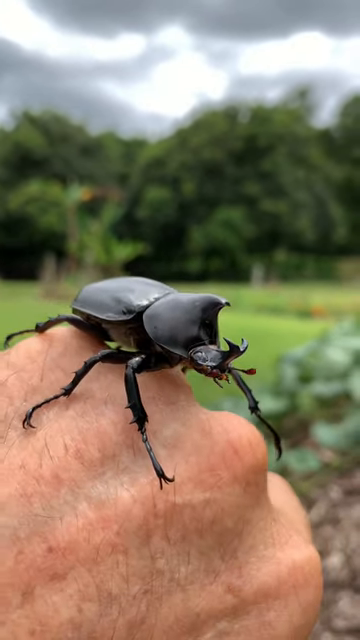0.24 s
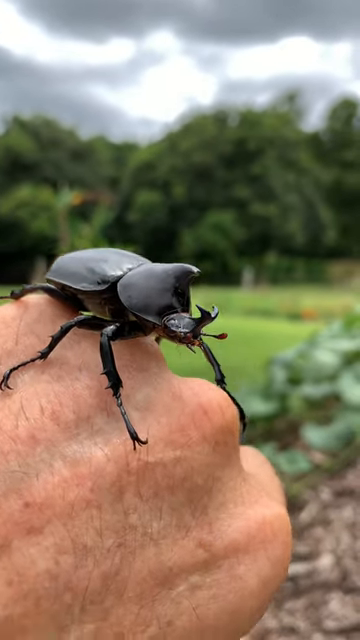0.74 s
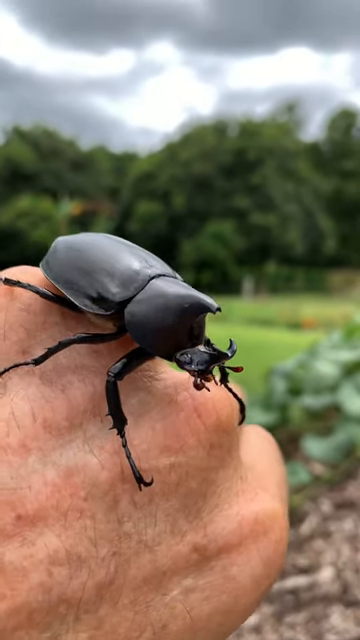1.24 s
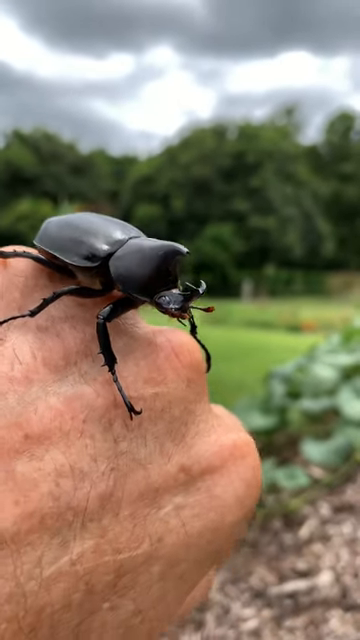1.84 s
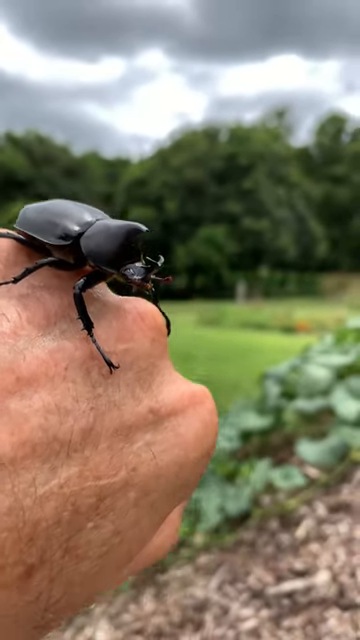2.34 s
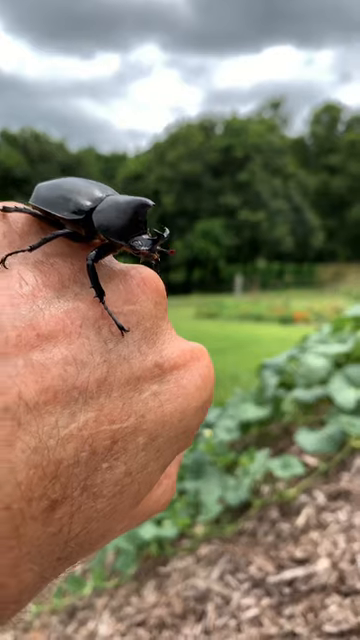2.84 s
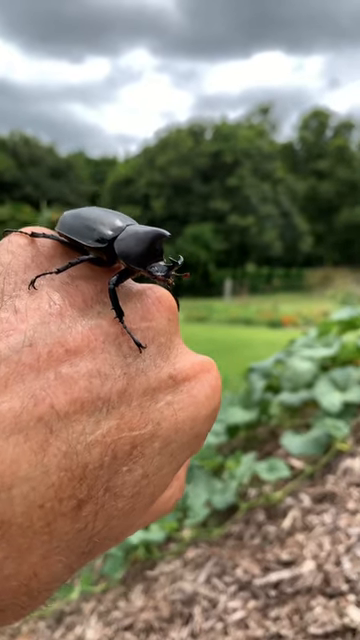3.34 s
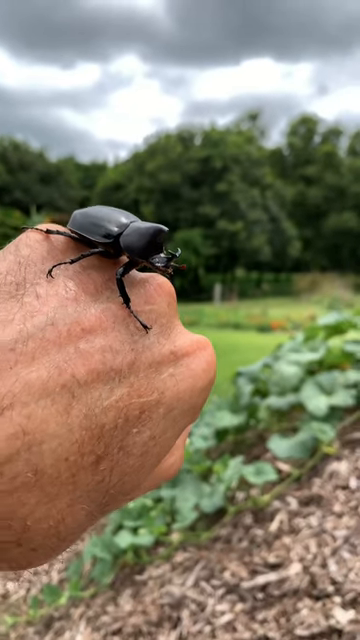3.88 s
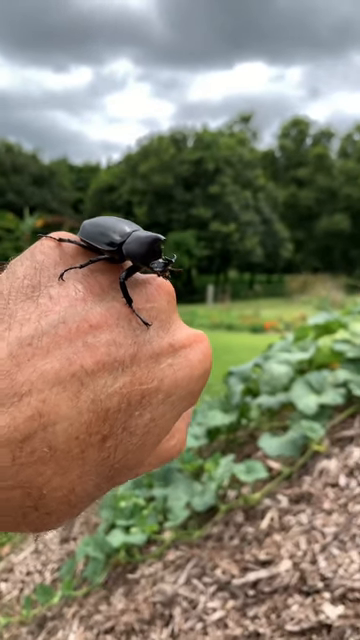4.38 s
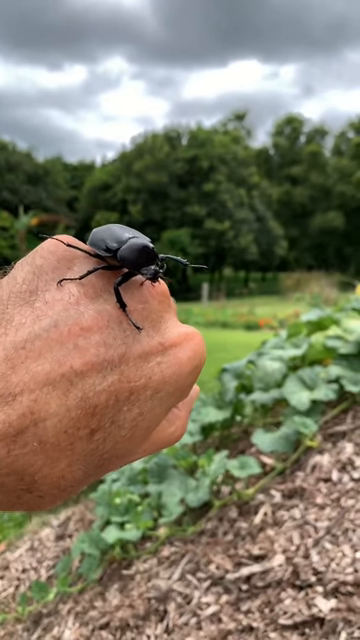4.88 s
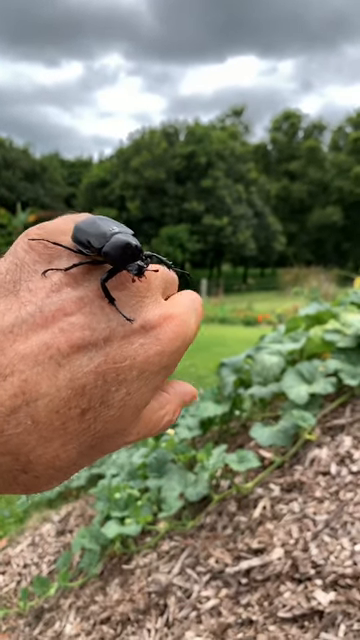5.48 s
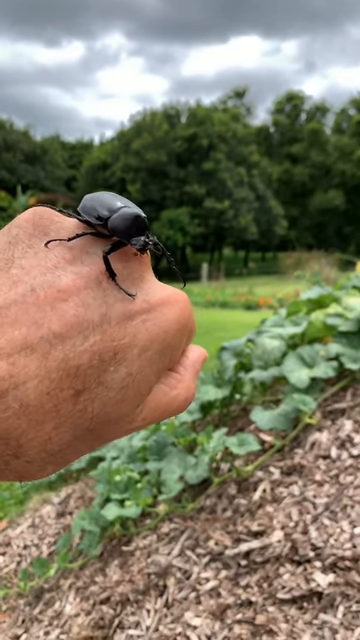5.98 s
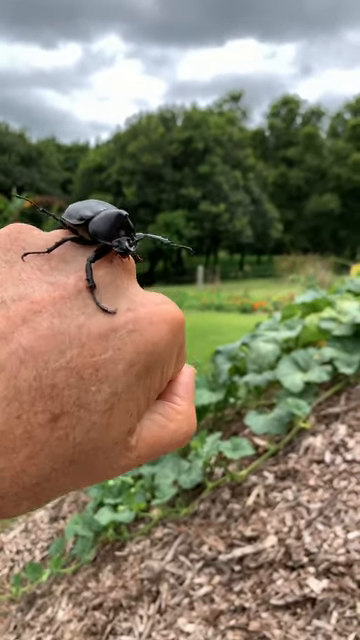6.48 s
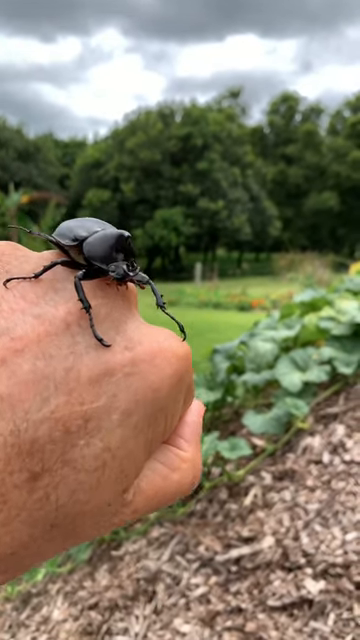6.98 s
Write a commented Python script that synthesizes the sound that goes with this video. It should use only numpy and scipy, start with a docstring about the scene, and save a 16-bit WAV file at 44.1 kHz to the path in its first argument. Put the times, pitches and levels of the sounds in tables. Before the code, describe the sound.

Outdoors by trees, cicadas make a bright, dense, fluttering hiss, surging in the first two seconds, then holding and gently fading near the end. Far away a low engine drones with soft road rumble. Close to a handheld phone, a large beetle gives one short dry rasp past the middle, and a tight cluster of rasps with tiny ticks near the end.

```python
"""At the edge of a summer wood cicadas swell in surges: clicking tymbals ring air sacs amid scattering leaves.
From the start a far engine drones in exhaust harmonics over shaped road noise, whose tyre rush slowly grows.
An early tick, a narrow band of noise, sounds; later the engine slows a little and the song begins to fade.
Then, close by, a big beetle on a hand drags a file under ringing wing cases in short rasps, amid more ticks.
A hand-held phone hears the scene through two closely spaced ports and cuts the extreme treble."""
import sys
import numpy as np
from scipy import signal
from scipy.fft import rfft, irfft
from scipy.io import wavfile
from scipy.ndimage import uniform_filter1d

SR = 44100
rng = np.random.default_rng(int(sys.argv[2]) if len(sys.argv) > 2 else 0)


def wav_out(sig):
    """Save sig, one row per channel (or a flat mono array), as 16-bit PCM at SR to the path in sys.argv[1]."""
    wavfile.write(sys.argv[1], SR, np.round(np.clip(np.atleast_2d(sig).T, -1, 1) * 32767).astype(np.int16))


N = 318402

# resonance of tymbal and air sac: f/Hz, gain/dB, phase lead of left port/rad
TYMBAL_RESONANCE = [(3000, -50, -3.1), (4000, -39, -4), (4400, -38.5, -3.7), (5100, -29, -3.1),
                    (5400, -25.5, -3), (5700, -21, -2.5), (6000, -14, -2), (6600, -7.5, -1.3),
                    (7600, -5, -.4), (8500, 0, 0), (9500, -2.2, .7), (10300, -6.5, 1.5), (11000, -13, 2.4),
                    (11500, -19, 3.1), (12400, -23, 3.6), (13200, -30, 3.2), (14000, -37, 3.6),
                    (15000, -32, 6.2)]
# singers: nominal click rate/Hz, relative level/dB, throb depth (0-1), throb rate (multiple of THROB_HZ)
SINGERS = [(886, -2, 0.14, 1), (752.4, -2, 0, 1.29), (1040, -32, 0.7, .9)]
THROB_HZ = 26.03  # beat of the abdomens


def cicadas():
    """Source and resonator: click trains excite each air sac; a pumping abdomen modulates their amplitude."""
    ring_db, left_lead = spectra(TYMBAL_RESONANCE)
    chorus = 0
    for click_rate, db, depth, pace in SINGERS:
        throb_phase = turns(pace * THROB_HZ + 0.45 * walk(2.76))
        throb = 1 + depth * np.sin(throb_phase)
        clicks = rib_clicks(click_rate, jitter=.28, scatter_db=1.0) * throb
        scattered = foliage(clicks, t60_s=0.031, direct=0.49)
        left, right = rfft(scattered) * undb(ring_db)
        # the phase between the ports depends on frequency
        song = irfft([left * np.exp(1j * left_lead), right], N)
        chorus = chorus + undb(db) * unit(song)
    # moving air makes the chorus waver a little
    return unit(chorus) * undb(song_level() + .2 * walk(9))


# surges while the cicadas warm up: middle t/s, duration/s, lift/dB
SURGES = [(.085, 0.4, 5), (0.426, 0.2, 2), (0.767, 0.25, 4), (1.07, 0.088, 0.5), (1.31, 0.3, 1.5),
          (1.69, 0.25, 1)]
# level the build-up approaches, initial deficit, and time constant of the build-up
SONG_DB, BUILD_DB, BUILD_S = -30.0, 10, 0.89
# onset and rate of the fade as the chorus tires
TIRE_S, FADE_DB_PER_S = 4.52, 1.2


def song_level():
    """Exponential approach in dB, lifted by surges, then a linear decline as the chorus tires."""
    t = np.arange(N) / SR
    build_db = SONG_DB - BUILD_DB * np.exp(-t / BUILD_S)
    fade_db = FADE_DB_PER_S * np.maximum(t - TIRE_S, 0)
    surge_db = sum(lift_db * hump(middle_s, length_s) for middle_s, length_s, lift_db in SURGES)
    return build_db - fade_db + surge_db


SCATTER_OWN_SHARE = .06  # share of scattered power independent at each port, 0-1


def foliage(x, t60_s, direct):
    """Multiple scattering: stirring leaves spread each click into a dense, exponentially decaying tail."""
    keep = np.exp(-2 * np.log(1000) / (t60_s * SR))  # energy falls 60 dB in t60_s
    energy = signal.lfilter([1 - keep], [1, -keep], x ** 2)
    shared_noise = np.sqrt(1 - SCATTER_OWN_SHARE) * rng.standard_normal(N)
    own_noise = np.sqrt(SCATTER_OWN_SHARE) * rng.standard_normal((2, N))
    return direct * x + np.sqrt(energy) * (shared_noise + own_noise)


def rib_clicks(rate, jitter, scatter_db):
    """Impulse excitation: ribs or file teeth click in turn, each a little uneven in time and force."""
    chance = rng.standard_normal((int(2 * rate * N / SR), 2))
    gaps = np.exp(jitter * chance[:, 0]) * SR / rate
    at = np.cumsum(gaps).astype(int)
    return np.bincount(at, undb(scatter_db * chance[:, 1]), N)[:N]


# the beetle's strokes: start t/s, duration/s, level/dB
RASPS = [(4.66, .118, -45.3), (4.745, .075, -59), (6.387, .103, -44.7), (6.461, .1, -47),
         (6.512, .122, -50)]
# resonance of the wing cases: f/Hz, gain/dB, left minus right level/dB, phase lead of left port/rad
WING_CASE = [(1000, -30, 0, 2), (1400, -14, 0, 1.5), (1850, -8, -2, 1.1), (2300, -9, -3, .7),
             (2700, -5.5, -3.5, 1.7), (3100, -3, -2, 2.45), (3500, -2, -.5, 2.95), (3900, -3, 0, 2.9),
             (4350, .5, 0, 3.1), (4800, -1.5, 0, 3.14), (5400, -6, 0, 3.14), (7000, -13, 0, 2.3),
             (15000, -24, 0, 3.1)]
# nominal rate of the file teeth; rise and fall times of a stroke's force before it is rounded
TEETH_PER_S, RASP_ATTACK_S, RASP_RELEASE_S = 1400, .048, .068
# stick-slip: mean jerk rate, and level swing up and down
JERKS_PER_S, JERK_DB = 130, 2
# upper edge of the dull part, and its total gain rise over a stroke
DULL_HZ, DULL_RISE_DB = 2900, 7


def beetle():
    """Stridulation with stick-slip: a jerking file rings the wing cases; each stroke grows duller to its end."""
    t = np.arange(N) / SR
    teeth = unit(rib_clicks(TEETH_PER_S, jitter=.4, scatter_db=2.5))
    jerks = np.sin(turns(JERKS_PER_S * (1 + .3 * walk(100))))
    scrape = unit((teeth + rng.standard_normal(N)) * undb(JERK_DB * jerks))
    ring_db, pan_db, left_lead = spectra(WING_CASE)
    port_phase = np.exp(1j * left_lead * np.array([[1], [0]]))
    ring = rfft(scrape) * undb(ring_db) * port_gains(pan_db) * port_phase
    ring = ring * (bins() > WING_CASE[0][0])  # nothing below the first table frequency
    sound = unit(irfft(ring, N))
    dull = irfft(rfft(sound) / (1 + (bins() / DULL_HZ) ** 8), N)
    bright = sound - dull
    out = 0
    for start_s, length_s, db in RASPS:
        age = t - start_s
        rise = age / RASP_ATTACK_S
        fall = (length_s - age) / RASP_RELEASE_S
        force = np.clip(np.minimum(rise, fall), 0, 1)
        force = np.sin(np.pi / 2 * force / force.max()) ** 1.5
        progress = np.clip(age / length_s, 0, 1) - .5  # from -0.5 to 0.5 over the stroke
        stroke = bright + dull * undb(DULL_RISE_DB * progress)
        out = out + undb(db) * force * stroke
    return out


# ticks: middle t/s, duration/s, centre f/Hz, half-amplitude bandwidth/Hz, level/dB
TICKS = [(1.186, .04, 3330, 280, -68), (4.696, .022, 3400, 400, -57), (4.712, .024, 2900, 400, -58),
         (6.447, .018, 2250, 300, -53), (6.474, .014, 1750, 500, -56), (6.497, .014, 1300, 600, -54)]


def ticks():
    """Narrow-band noise bursts: tiny pitched ticks, perhaps the beetle's file or a claw catching."""
    noise = rfft(rng.standard_normal(N))
    out = 0
    for middle_s, length_s, hz, width_hz, db in TICKS:
        ring = irfft(noise / (1 + (2 * (bins() - hz) / width_hz) ** 2), N)
        shape = hump(middle_s, length_s)
        ring_rms = np.sqrt(np.average(ring ** 2, weights=shape ** 2))
        out = out + ring * shape * undb(db) / ring_rms
    return out


# loudness of the far engine: t/s, level/dB
ENGINE_LEVEL = [(0.0, -59.5), (0.48, -56), (4.04, -51), (4.87, -47.5), (6.76, -59), (7.0, -52),
                (7.22, -51.5)]
# exhaust tones: multiple of the cycle rate, relative level/dB, left minus right level/dB
EXHAUST = [(4, -10.5, 6), (5, -1, 2), (8, -1, 6.5), (10, -18, 8), (16, -25, 13)]
# initial cycle rate, onset of slowing, and loss of cycle rate
CYCLE_HZ, SLOW_AT_S, SAG_HZ_PER_S = 17.1, 3.9, .2


def engine():
    """Harmonic series: only the lowest exhaust tones carry this far; moving air makes each one waver."""
    db, = curves(ENGINE_LEVEL)
    slowing_s = np.maximum(np.arange(N) / SR - SLOW_AT_S, 0)
    cycle_hz = CYCLE_HZ - SAG_HZ_PER_S * slowing_s
    phase = turns(cycle_hz * (1 + 0.0018 * walk(4.03)))
    out = 0
    for multiple, tone_db, pan_db in EXHAUST:
        tone = np.sqrt(2) * np.sin(multiple * phase + rng.uniform(0, 2 * np.pi))
        waver_db = .5 * walk(9.9)
        out = out + tone * undb(db + tone_db + waver_db) * port_gains(pan_db)
    return out


# road spectrum before the band levels: f/Hz, spectral density level/dB (per Hz),
# left minus right level/dB, phase lead of left port/rad, likeness of the ports (0-1)
ROAD = [(19.8, -86, 15, 2, 1), (35.2, -95, 8, -0.5, 0.9), (53.5, -66.5, 2, 0, 0.99),
        (70.7, -66, 1, -0.6, 1), (103, -72.5, 4.5, -0.5, 0.9), (168.5, -78.5, 6.5, 0.9, 1),
        (263, -86, 10.5, 0.5, 0.63), (395, -90.5, 5, 2.5, 0.53), (524, -86, 6, 2.5, 0.67),
        (708, -77, 0.5, 3.5, 0.97), (1080, -82.5, -0.5, 4.5, 0.99), (1435, -88, 0, 4, 0.69),
        (2070, -98.5, -2.5, 5.5, 0.35), (2634, -107, -1, 8, 0.67), (3110, -110, -1, 10, 1),
        (8140, -125, 4, -3, 1)]
# swells of the deepest rumble: t/s, lift/dB
RUMBLE_SWELL = [(0, 3), (.48, 5.5), (.62, 0), (1.75, .5), (2.45, 3), (3.9, 2.3), (4.6, -1.2), (5.55, 1.7),
                (5.95, -1), (6.3, 2), (6.7, 2.5), (7.22, 4.5)]
# band levels: rumble, tyre rush at the start, and growth of the rush
RUMBLE_DB, TYRE_DB, TYRE_DB_PER_S = -1.2, -0.5, 0.4571


def road(split_hz=350, deep_hz=95):
    """Shaped, partly coherent noise: rumble with deep swells, and tyre rush growing as the traffic nears."""
    db, pan_db, left_lead, likeness = spectra(ROAD)
    likeness = np.clip(likeness, 0, 1)
    # white noise scaled to unit power per Hz
    shared, own = rfft(rng.standard_normal((2, N))) * np.sqrt(SR / 2)
    left = likeness * shared + np.sqrt(1 - likeness ** 2) * own
    left = left * np.exp(1j * left_lead)
    air = np.array([left, shared]) * undb(db) * port_gains(pan_db)
    low = 1 / (1 + (bins() / split_hz) ** 4)
    deep = 1 / (1 + (bins() / deep_hz) ** 8)
    swell_db, = curves(RUMBLE_SWELL)
    deep_rumble = irfft(air * low * deep, N) * undb(swell_db)
    upper_rumble = irfft(air * low * (1 - deep), N)
    # both bands drift a little in level
    rumble = (deep_rumble + upper_rumble) * undb(RUMBLE_DB + 1.0 * walk(6))
    tyre_db = TYRE_DB + TYRE_DB_PER_S * np.arange(N) / SR
    tyres = irfft(air * (1 - low), N) * undb(tyre_db + 1.0 * walk(8.7))
    return rumble + tyres


def undb(db):
    """Logarithmic level: decibels to amplitude gain."""
    return 10 ** (np.asarray(db) / 20)


def curves(table):
    """Linear interpolation in time: each column of a time table, one value per sample."""
    s, *columns = np.transpose(table)
    return [np.interp(np.arange(N) / SR, s, c) for c in columns]


def bins():
    """Discrete Fourier frequencies of a whole-length spectrum, in Hz."""
    return np.arange(N // 2 + 1) * SR / N


def spectra(table):
    """Log-frequency interpolation: each column of a frequency table, one value per bin."""
    hz, *columns = np.transpose(table)
    return [np.interp(np.log(bins() + 1), np.log(hz), c) for c in columns]


def unit(x):
    """Power normalisation: scale to rms 1."""
    return x / np.sqrt(np.mean(x ** 2))


def walk(rate):
    """Slow random modulation: chance levels held 1 / rate s, smoothed twice, with rms 1."""
    k = int(SR / rate)
    held = np.repeat(rng.standard_normal(N // k + 1), k)
    smooth = uniform_filter1d(uniform_filter1d(held, k), k)
    return unit(smooth[:N])


def turns(hz):
    """Phase as the integral of frequency: radians from a moving rate."""
    return 2 * np.pi * np.cumsum(hz) / SR


def port_gains(db):
    """Interchannel level difference: left and right gains, half the difference each way."""
    return undb(np.array([[1], [-1]]) * db / 2)


def hump(middle_s, length_s):
    """Raised-cosine envelope: a smooth rise from 0 to 1 and back."""
    position = (np.arange(N) / SR - middle_s) / length_s
    return np.cos(np.pi * np.clip(position, -.5, .5)) ** 2


def scene():
    """Superposition: cicadas, beetle and ticks over the far engine and road."""
    return cicadas() + beetle() + ticks() + engine() + road()


TOP_HZ = 15800  # upper edge of the phone's passband


def record(dry):
    """Band limiting: a steep elliptic low-pass cuts the phone's top."""
    top_cut = signal.ellip(10, .1, 70, TOP_HZ, fs=SR, output="sos")
    return signal.sosfilt(top_cut, dry)


dry = scene()
out = record(dry)
wav_out(out)
```